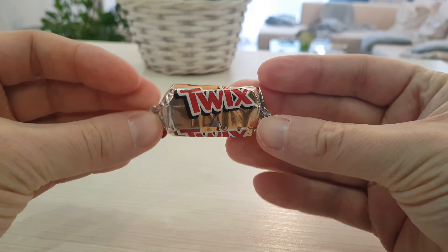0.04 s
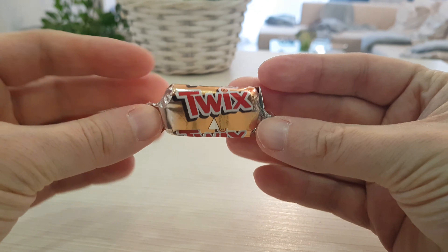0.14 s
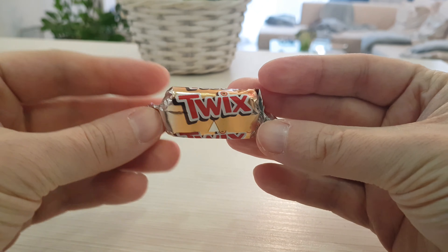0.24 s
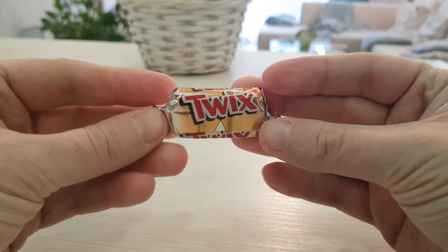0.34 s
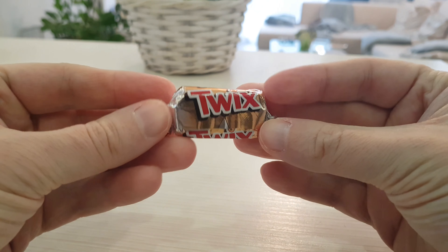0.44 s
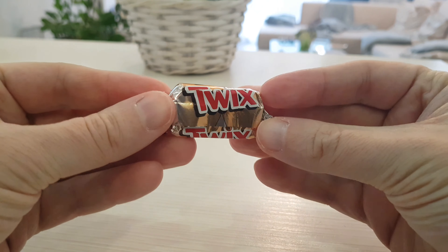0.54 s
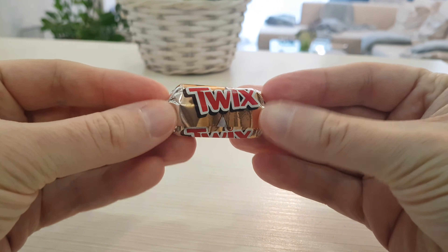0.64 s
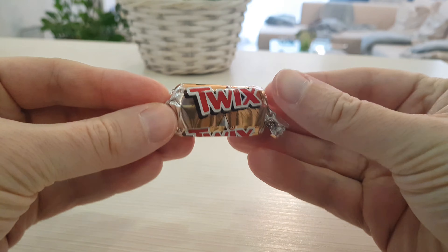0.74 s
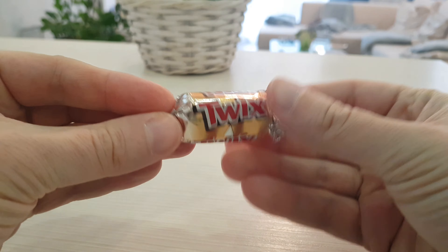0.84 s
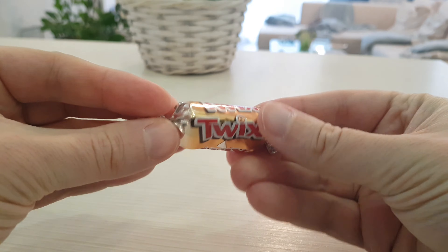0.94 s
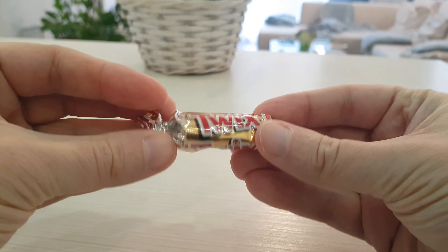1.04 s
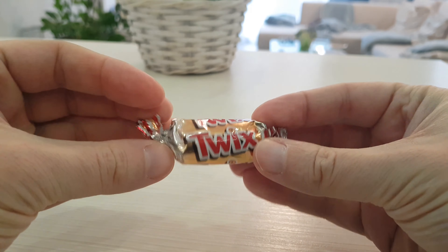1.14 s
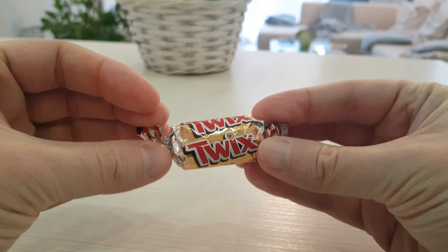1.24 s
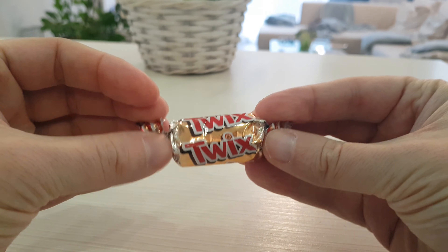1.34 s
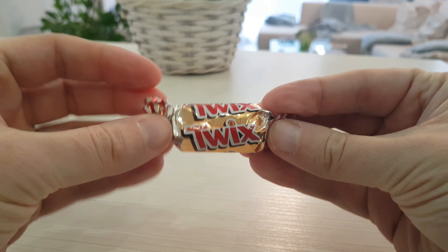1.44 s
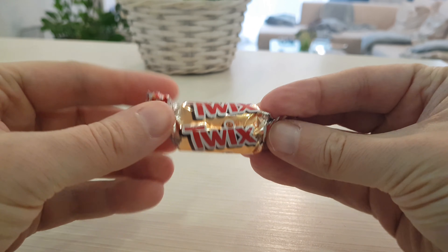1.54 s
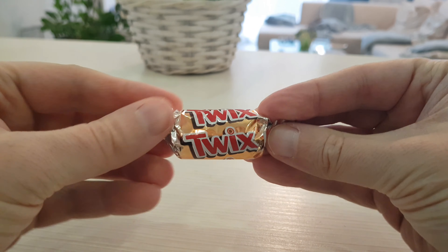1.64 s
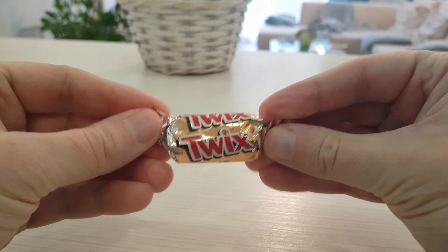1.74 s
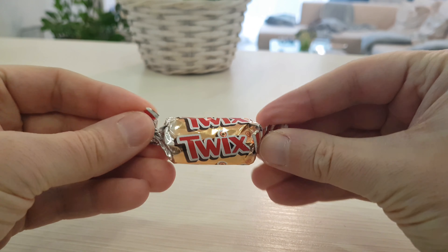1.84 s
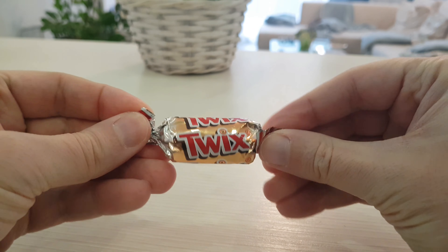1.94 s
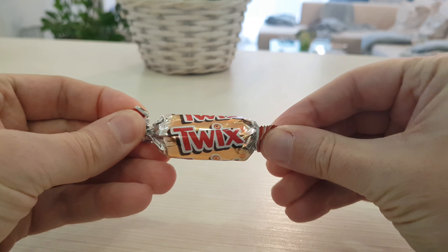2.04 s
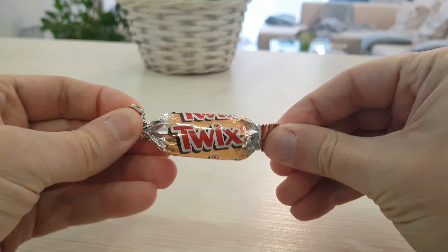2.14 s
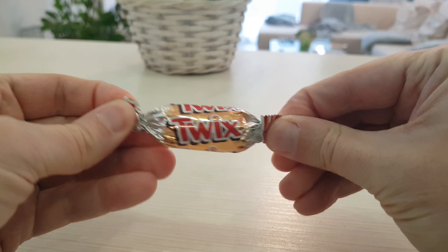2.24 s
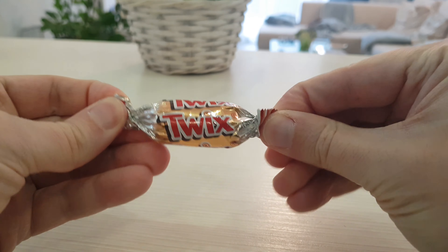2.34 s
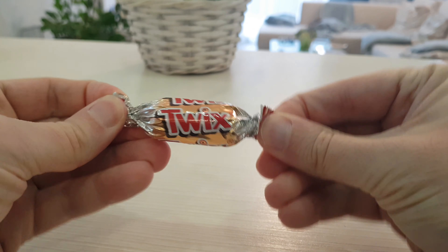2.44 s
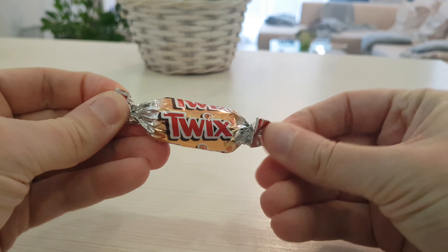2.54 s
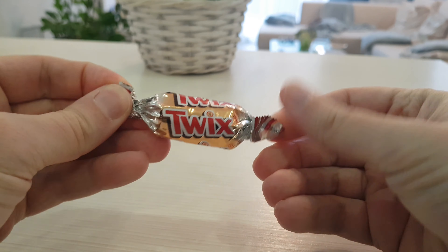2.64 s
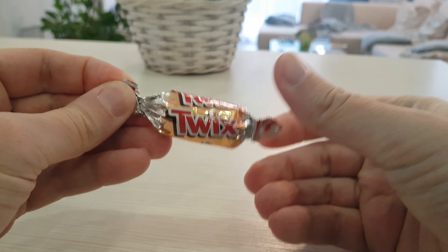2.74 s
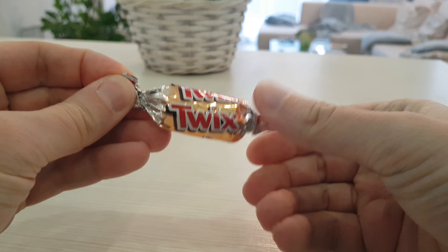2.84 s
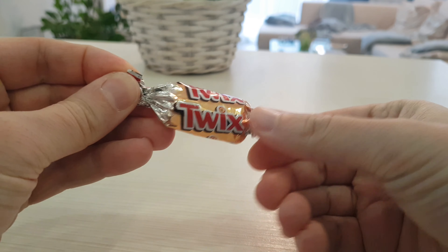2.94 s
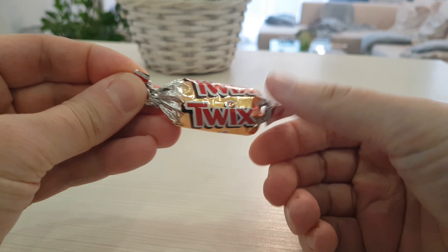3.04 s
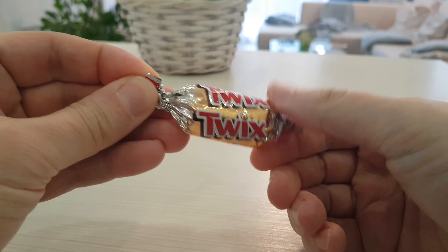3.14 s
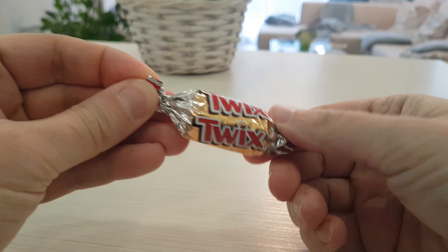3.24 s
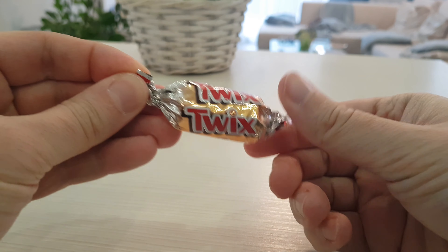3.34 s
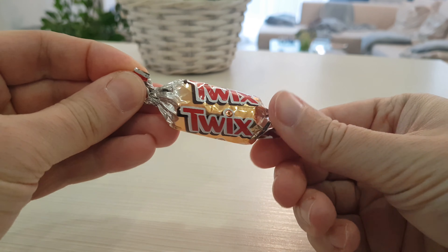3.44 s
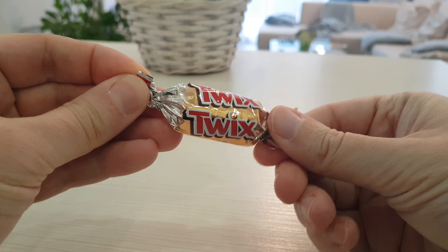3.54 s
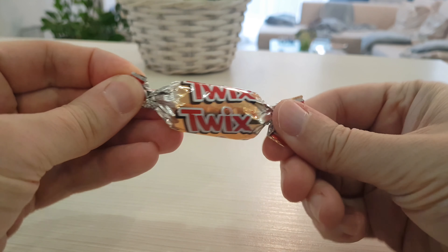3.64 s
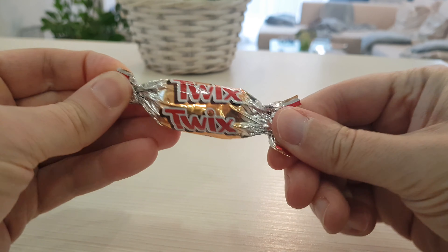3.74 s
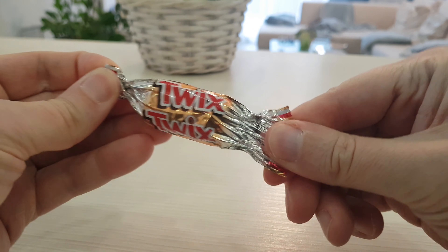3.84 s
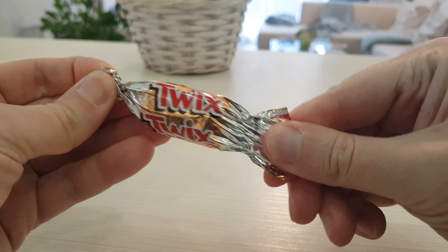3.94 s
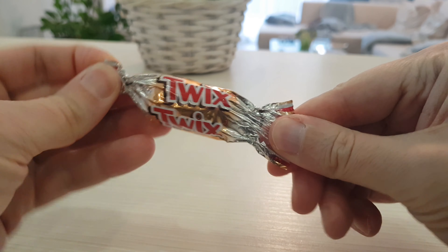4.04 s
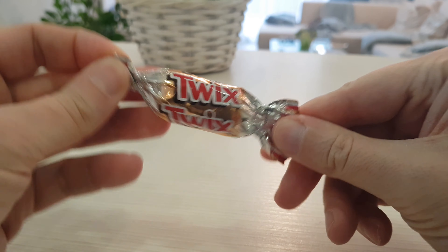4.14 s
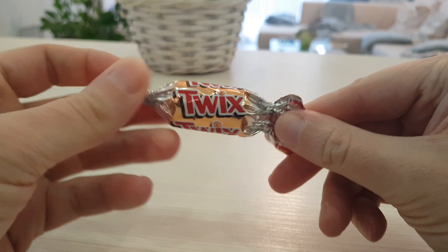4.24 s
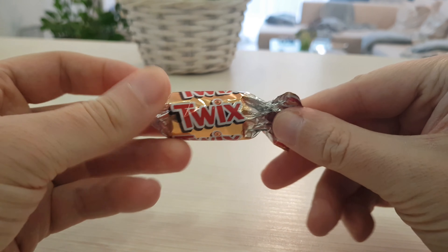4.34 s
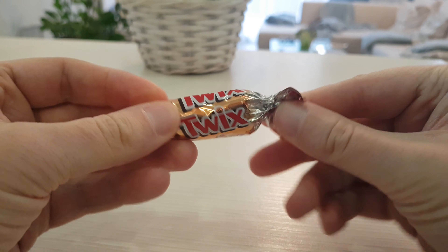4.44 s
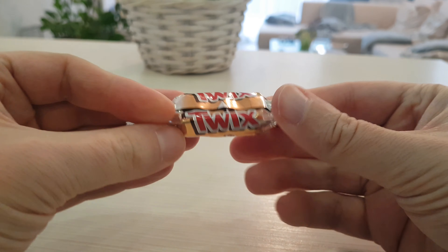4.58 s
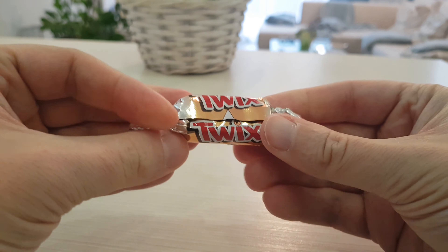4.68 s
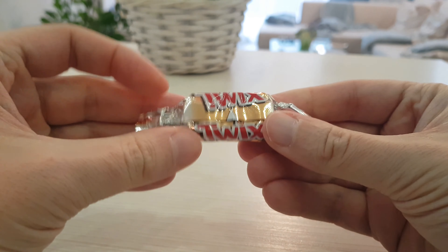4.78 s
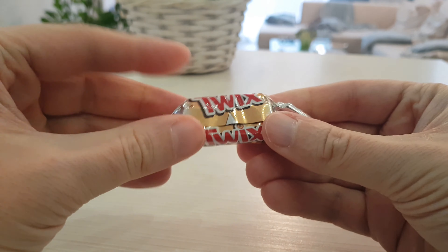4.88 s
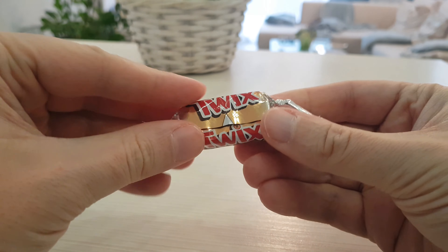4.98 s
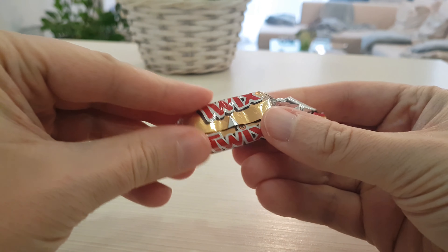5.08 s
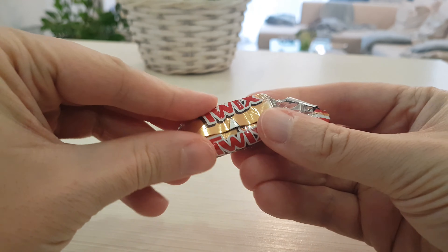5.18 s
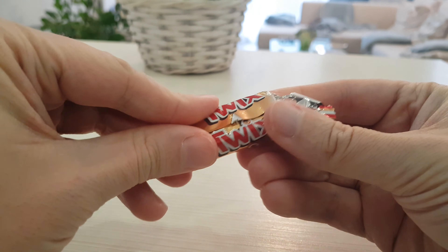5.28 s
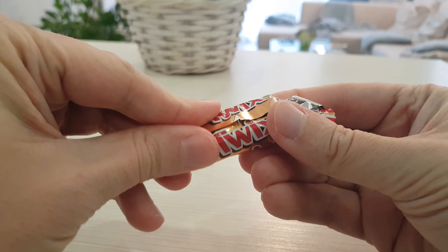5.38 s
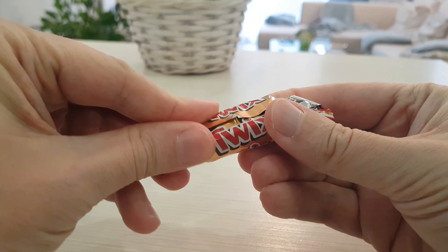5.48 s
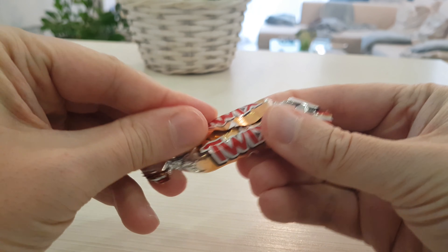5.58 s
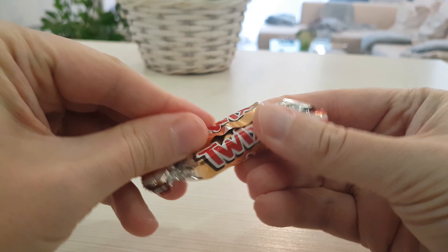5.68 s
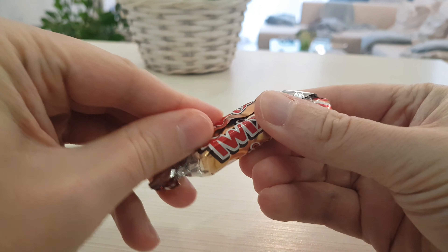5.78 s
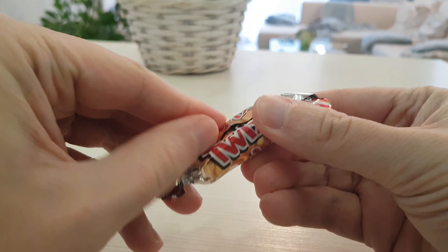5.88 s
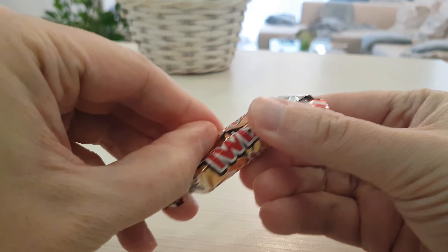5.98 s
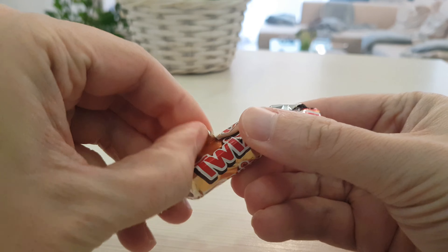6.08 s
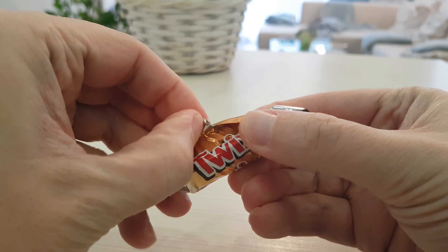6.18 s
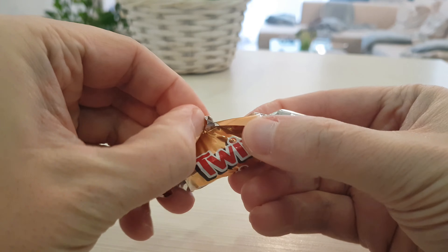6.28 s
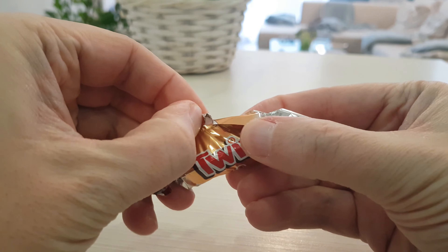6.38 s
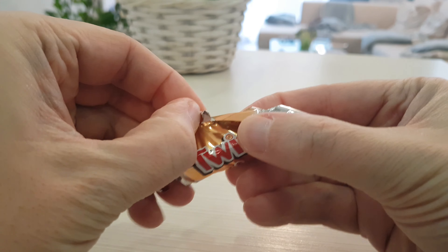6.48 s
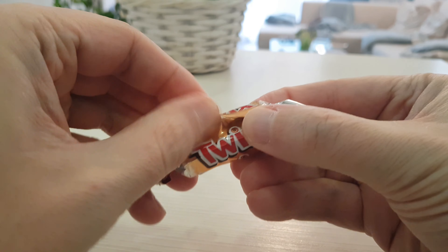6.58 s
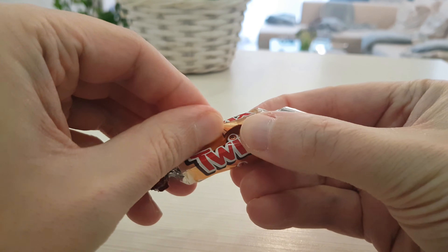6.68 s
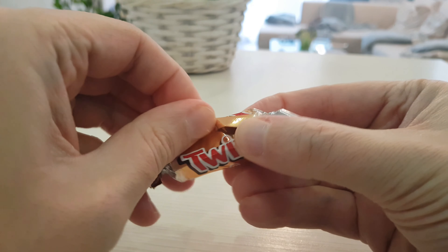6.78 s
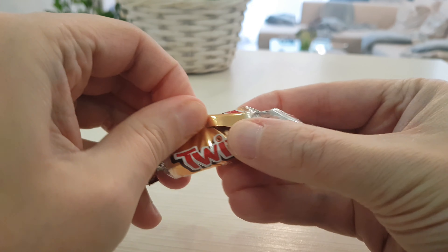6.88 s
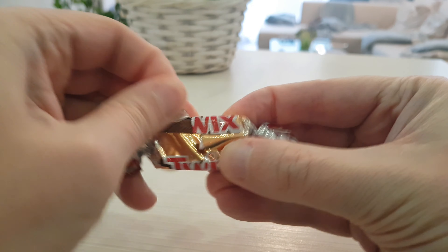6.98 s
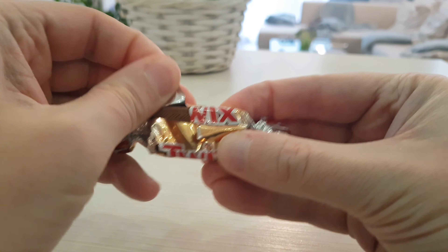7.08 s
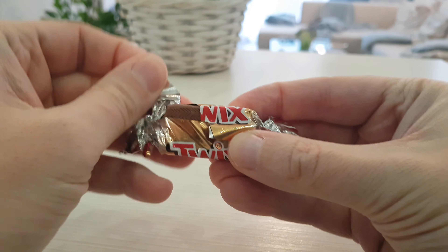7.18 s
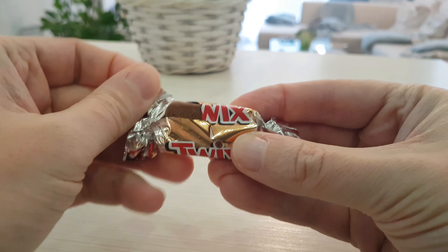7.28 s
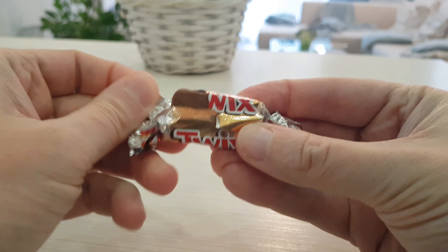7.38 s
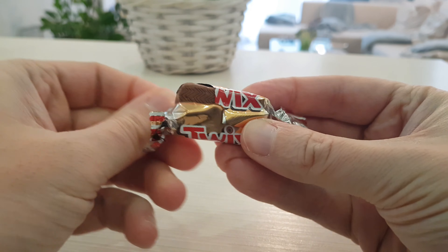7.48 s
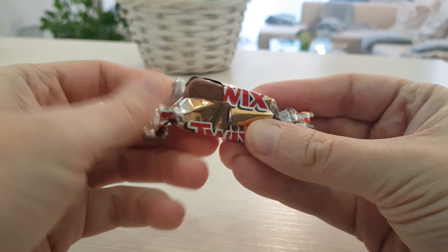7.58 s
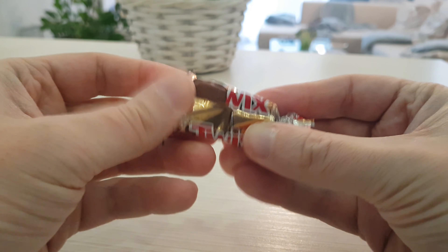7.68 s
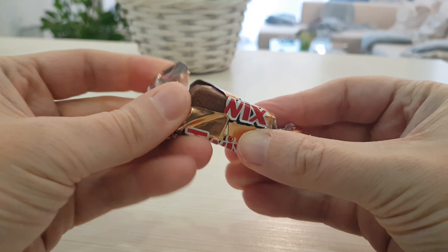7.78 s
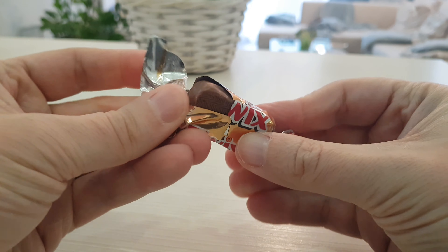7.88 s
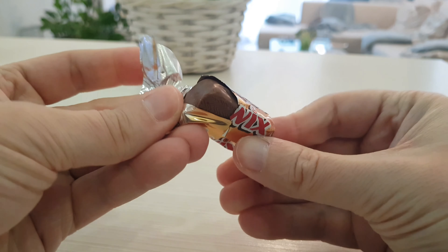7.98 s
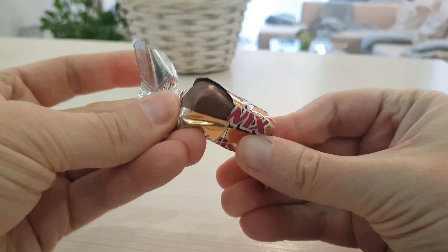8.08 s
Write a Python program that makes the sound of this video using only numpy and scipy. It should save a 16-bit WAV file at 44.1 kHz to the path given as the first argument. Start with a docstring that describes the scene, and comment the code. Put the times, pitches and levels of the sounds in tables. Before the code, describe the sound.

A foil candy wrapper crinkles and snaps in bright, uneven bursts as fingers twist it open close by, over a faint low hum.

```python
"""Fingers twist and peel a foil candy wrapper open, close by on a table in a quiet room.
From the start an appliance hums in steady tones over filtered noise for air, and the held foil stirs faintly.
Soon creases snap for about a millisecond each (clicks through resonances), with swarms of tiny clicks between.
From about 0.9 s the hollow wrapper knocks now and then, and near 3 s a fingertip rubs it (jerky noise).
Snaps crowd around 2.2, 3.9, 6.2 and 7.3 s; the strongest two knocks, the seam popping, come after 7 s."""
import sys
import numpy as np
from scipy import signal
from scipy.fft import rfft, irfft, next_fast_len
from scipy.io import wavfile
from scipy.ndimage import uniform_filter1d, map_coordinates

SR = 44100
rng = np.random.default_rng(int(sys.argv[2]) if len(sys.argv) > 2 else 0)


def dump(signal):
    """Clip the signal to [-1, 1] and save it as 16-bit WAV at the path in sys.argv[1]."""
    limited = np.clip(np.atleast_2d(signal).T, -1, 1)
    pcm = np.round(limited * 32767).astype(np.int16)
    wavfile.write(sys.argv[1], SR, pcm)


N = 358091

# creases that buckle loudly: t/s, crack level/dB, pitch f/Hz, sizzle level/dB (levels before a common trim)
CREASES = [(0.054, -42.5, 5200, -45), (0.1576, -32.5, 5960, -42), (0.2244, -42, 4660, -39),
           (1.2219, -37.5, 5044, -44.5), (1.2273, -33.5, 5430, -37), (1.396, -39, 5330, -44),
           (1.4282, -30.5, 4660, -32.5), (1.483, -44, 4388, -39), (1.5628, -35.5, 4680, -30),
           (1.648, -39, 5440, -39), (1.6601, -41.5, 5240, -45), (1.82, -31.5, 6440, -47),
           (1.8621, -33.5, 6170, -40.5), (1.904, -41.5, 6800, -53), (1.9823, -40, 5549, -48),
           (2.0054, -45, 2391, -54), (2.0928, -34.5, 3560, -32), (2.11, -29.5, 5900, -37),
           (2.1403, -24, 4350, -29), (2.1535, -34, 4610, -31), (2.215, -35, 4673, -36),
           (2.222, -26.5, 4000, -37), (2.2302, -23, 4230, -46), (2.243, -32, 4100, -36),
           (2.2726, -37, 5795, -37), (2.2886, -30, 6520, -33), (2.2998, -23.5, 4630, -31),
           (2.308, -27.5, 3500, -53), (2.33, -23, 4650, -31.5), (2.369, -25, 3740, -37),
           (2.5118, -33, 5200, -43), (2.6256, -31, 5684, -35), (2.696, -39, 4585, -43),
           (2.9018, -43.5, 5420, -43), (2.9974, -37, 4130, -40), (3.0207, -28, 3100, -37.5),
           (3.2767, -40, 3130, -51), (3.2873, -35.5, 4488, -37), (3.4111, -38, 3500, -38),
           (3.4651, -37.5, 4390, -45), (3.49, -40.5, 2730, -42.5), (3.5912, -31, 4600, -42),
           (3.6271, -26.5, 3900, -39.5), (3.756, -31, 3225, -32.5), (3.806, -26, 3695, -33),
           (3.815, -25, 5030, -28), (3.8228, -24, 4370, -35), (3.8432, -24.5, 4000, -40),
           (3.847, -19.5, 3900, -32), (3.862, -34, 4770, -21.5), (3.8685, -19.5, 3300, -36),
           (3.9173, -39, 5500, -29), (3.9227, -25.5, 4237, -26), (3.943, -20, 4400, -30),
           (3.95, -24, 3905, -23.5), (3.9623, -26, 3218, -36), (3.9981, -30.5, 5810, -33.5),
           (4.051, -23.5, 4300, -32), (4.067, -35, 4850, -36), (4.1671, -34.5, 3900, -46),
           (4.1776, -34.5, 3710, -65), (4.2071, -33.5, 4184, -47), (4.2497, -32, 4600, -50),
           (4.3477, -34.5, 5015, -36), (4.427, -37.5, 5000, -36), (4.5136, -34.5, 5356, -48),
           (4.543, -24.5, 3695, -33), (4.5919, -34, 3382, -32), (4.6045, -36, 5110, -46),
           (4.6278, -43, 5010, -36), (4.6322, -35, 5190, -42), (4.759, -32.5, 4340, -41),
           (4.8621, -38.5, 4610, -63), (5.0962, -38.5, 4300, -69), (5.2081, -36, 3803, -50),
           (5.2537, -36.5, 4443, -55), (5.3149, -36, 4300, -38.5), (5.4112, -31.5, 5256, -30),
           (5.511, -31.5, 4740, -38), (5.6321, -39, 5363, -43), (5.7632, -40, 5472, -44),
           (5.8078, -32, 5590, -39), (5.9523, -42, 4446, -46), (6.0153, -34.5, 5630, -39),
           (6.0242, -38, 5350, -36), (6.0458, -34, 4100, -37.5), (6.0907, -35, 5055, -32),
           (6.1231, -33.5, 5614, -38), (6.185, -26.5, 5470, -41), (6.19, -26.5, 4800, -19.5),
           (6.1983, -29, 4300, -41), (6.2304, -32, 4210, -44), (6.235, -23.5, 4140, -31.5),
           (6.2744, -33, 4586, -38.0), (6.2937, -31.5, 3990, -33.5), (6.3, -33, 4050, -39),
           (6.3101, -41, 2650, -56), (6.3308, -33.5, 4763, -42.5), (6.379, -36.5, 4910, -38),
           (6.4006, -41.5, 3030, -46), (6.416, -41.5, 3580, -47), (6.44, -32.5, 3860, -39),
           (6.461, -41, 5095, -40), (6.7225, -31, 5690, -38), (6.739, -33.5, 3415, -36),
           (6.7573, -29, 5310, -36), (6.764, -26.5, 5505, -34), (6.7915, -34.5, 4126, -47),
           (6.8686, -40, 3634, -39.5), (6.919, -26.5, 4883, -39), (7.0052, -33.5, 3543, -46),
           (7.189, -33, 5803, -49), (7.1992, -29, 4287, -49), (7.2383, -25.5, 6005, -34),
           (7.249, -27.5, 4580, -27), (7.2556, -36, 5494, -35), (7.2666, -28, 4470, -31),
           (7.2733, -22, 4404, -24.5), (7.3092, -43, 5598, -38), (7.323, -30, 5564, -27),
           (7.384, -29, 4314, -22), (7.4055, -25, 4250, -23), (7.4518, -35.5, 4580, -41),
           (7.518, -32, 5910, -35.5), (7.6139, -35, 3290, -41), (7.677, -26.5, 3594, -26),
           (7.8327, -29, 4854, -35), (7.8635, -28, 5060, -28), (7.955, -32, 4312, -32.5),
           (7.975, -29.5, 4726, -38), (8.0434, -36, 6517, -40), (8.0837, -32.5, 4780, -36.5)]
# colour of the small facets: f/Hz, relative level per Hz/dB
FACET_COLOUR = [(400, -42), (1900, -20.5), (2900, -12), (4200, -0.5), (6200, 1.5), (8300, -15),
                (11500, -1.5), (15000, -6), (16500, -18)]
STRAIN_S = .002  # a facet creaks for this long before it flips


def amp(db):
    """Turn decibels into a plain gain."""
    return 10 ** (np.asarray(db) / 20)


def unit(x):
    """Scale a sound to an average strength (rms) of 1."""
    return x / np.sqrt(np.mean(x ** 2) + 1e-20)


def along(points, hz):
    """Read a value between (Hz, value) points, with pitch on a log axis."""
    f, v = np.transpose(points)
    return np.interp(np.log(hz + 1), np.log(f), v)


def curve(rows):
    """Join (time, value) points by straight lines, one value per sample."""
    s, values = np.transpose(rows)
    return np.interp(np.arange(N) / SR, s, values)


def wobble(rate):
    """A smooth random curve through a given number of random points a second."""
    points = rng.standard_normal(int(N * rate / SR) + 4)
    coarse = np.arange(0, N, 32)
    smooth = map_coordinates(points, [coarse * rate / SR])
    return np.interp(np.arange(N), coarse, smooth)


def filtered(x, response):
    """Change the strength and timing of each frequency by a complex response."""
    n = x.shape[-1]
    padded = 2 * next_fast_len((n + min(n, 8192)) // 2)
    spectrum = rfft(x, padded) * response(np.fft.rfftfreq(padded, 1 / SR))
    return irfft(spectrum, padded)[..., :n]


def coloured(x, spectrum, size=8192):
    """Colour a sound without smearing it backwards in time, so clicks keep their sharp front."""
    cepstrum = irfft(np.log(amp(along(spectrum, np.fft.rfftfreq(size, 1 / SR)))))
    # folding the cepstrum forwards makes a minimum-phase filter
    cepstrum[1:] *= 2 * (np.arange(1, size) < size // 2)
    kernel = irfft(np.exp(rfft(cepstrum)))[:x.shape[-1]]
    return signal.oaconvolve(x, np.array(kernel, ndmin=x.ndim), axes=-1)[..., :x.shape[-1]]


def resonate(x, modes):
    """Pass a sound through a few resonances: (centre Hz, width Hz, dB), with alternating signs."""
    def response(f):
        total = 0
        for k, (centre, width, db) in enumerate(modes):
            damping = 1j * f * width
            total = total + (-1) ** k * amp(db) * damping / (centre * centre - f * f + damping)
        return total
    return filtered(x, response)


def stereo_noise(side_db, size=N):
    """White noise with a given share of left-right difference."""
    mid, side = rng.standard_normal((2, size))
    return np.array([mid + amp(side_db) * side, mid - amp(side_db) * side])


def add(track, s, sound):
    """Mix a sound into the track at time s."""
    part = track[:, max(round(s * SR), 0):][:, :sound.shape[1]]
    part += sound[:, :part.shape[1]]


def background(hum_db, air_db, hiss_db, rumble_hz):
    """Slightly unsteady appliance tones over low room noise, a shifting rumble and faint hiss."""
    # the appliance's tones before a common trim: f/Hz, level/dB
    hum_tones = [(60.5, -67.5), (99, -74.5), (186, -68), (388.5, -75), (459.6, -72), (495, -71.5)]
    # one more tone swells and fades, before the same trim: t/s, level/dB
    swell = [(0.5, -76), (1.55, -61), (2.4, -75), (3.05, -65.5), (4.0, -68), (4.6, -80), (5.15, -63.5),
             (6.05, -66.5), (6.45, -75.5)]
    swell_hz = 247.8
    # colour of the room's murmuring air: f/Hz, relative level per Hz/dB
    air_colour = [(26, -26), (42, -2.5), (170, -2.5), (330, -1), (520, -9.5), (660, -19), (1400, -29),
                  (6000, -35)]
    # a low rumble swells as the hands move, before its random unsteadiness: t/s, level/dB
    rumble_levels = [(0, -62), (.2, -53), (.55, -61), (.95, -58.5), (1.8, -60), (2.1, -65), (3.1, -71),
                     (4.9, -60), (6.6, -65.5), (7.1, -56.5), (7.9, -54)]
    t = np.arange(N) / SR
    hum = np.zeros(N)
    for hz, db in list(hum_tones) + [(swell_hz, curve(swell))]:
        level = amp(db + 1.46 * wobble(0.9))
        phase = 2 * np.pi * hz * t + 0.5 * wobble(1)
        hum += level * np.sqrt(2) * np.sin(phase)
    air = unit(coloured(stereo_noise(-6.5), air_colour))
    low_band = signal.butter(3, [40, rumble_hz], "bandpass", fs=SR, output="sos")
    low = signal.sosfilt(low_band, stereo_noise(-18.0))
    rumble = amp(curve(rumble_levels) + 1.5 * wobble(7)) * unit(low)
    hiss = unit(coloured(stereo_noise(-0.53), FACET_COLOUR))
    return amp(hum_db) * hum + amp(air_db) * air + rumble + amp(hiss_db) * hiss


def work():
    """Levels in dB of small facets and broad panels: each twist grips, holds and settles."""
    # twists and tugs: start t/s, length t/s, crinkle level/dB, panel rustle relative to it level/dB
    # (levels before a common trim)
    twists = [(0.188, 0.038, -51, -26), (0.293, 0.046, -57, -20.5), (0.622, 0.15, -51, -16),
              (0.821, 0.095, -50, -12), (0.972, 0.2, -59, -12), (1.243, 0.0706, -47, -20),
              (1.434, 0.015, -39, -20), (1.492, 0.029, -44, -18), (1.584, 0.0946, -52, -19),
              (1.717, 0.2, -53.5, -24), (1.969, 0.037, -46, -20), (2.078, 0.11, -46, -14),
              (2.224, 0.022, -36, -20), (2.296, 0.079, -41, -17.5), (2.624, 0.12, -48, -10),
              (2.982, 0.11, -51, -12), (3.27, 0.06, -43, -12), (3.392, 0.03, -43, -11),
              (3.592, 0.056, -52, -9), (3.722, 0.061, -49, -9), (3.796, 0.075, -34, -18),
              (3.921, 0.034, -30.5, -20), (4.048, 0.079, -49, -18), (4.19, 0.19, -49, -12),
              (4.25, 0.058, -38, -14), (4.493, 0.15, -45.5, -13), (4.662, 0.038, -43, -10),
              (4.828, 0.039, -47, -16), (5.037, 0.085, -54, -14.5), (5.188, 0.14, -48, -13),
              (5.401, 0.01, -43, -16), (5.667, 0.016, -38, -19.5), (5.784, 0.024, -43, -17),
              (5.857, 0.01, -46, -14), (5.998, 0.15, -48, -21), (6.188, 0.025, -41.5, -20),
              (6.272, 0.074, -50, -13), (6.636, 0.295, -47.5, -10), (6.682, 0.0346, -41, -17.5),
              (7.021, 0.15, -48, -10), (7.045, 0.028, -33, -12), (7.21, 0.06, -40, -15.5),
              (7.332, 0.13, -43, -15), (7.511, 0.47, -53, -8), (7.611, 0.085, -42.5, -10.5),
              (8.031, 0.054, -40, -18.5)]
    grip_db_per_s, settle_db_per_s = 699.5, 560
    held_db, held_panels_db = -68.5, -14  # faint stirring of held foil; its panels relative to that
    t = np.arange(N) / SR
    # powers of overlapping twists add up
    small = np.full(N, amp(held_db) ** 2)
    broad = np.full(N, amp(held_db + held_panels_db) ** 2)
    for start, length, db, panels_db in twists:
        near = slice(*np.searchsorted(t, [start - .1, start + length + .3]))
        early = np.maximum(start - t[near], 0)
        late = np.maximum(t[near] - start - length, 0)
        power = amp(db - grip_db_per_s * early - settle_db_per_s * late) ** 2
        small[near] += power
        broad[near] += power * amp(panels_db) ** 2
    return 10 * np.log10(small), 10 * np.log10(broad)


def buckles(count, flip_t60, ring_t60, ring_db, side_db, pan_db, rise_t60, size=512, order=9):
    """Stereo clicks: a facet strains, flips in two steps, and the foil around it rings briefly."""
    # the lesser step falls within step_s of the main flip, before or after, typically step_db weaker
    step_s, step_db = .0018, -9
    tint_db = 3  # strength of each click's own spectral peaks and hollows
    each = (count, 1, 1)
    t = np.arange(size) / SR - STRAIN_S
    after, before = np.maximum(t, 0), np.minimum(t, 0)

    mode_hz = rng.uniform(700, 16000, (count, 1, order, 1))
    phase = rng.uniform(0, 2 * np.pi, (count, 1, order, 1)) + rng.normal(0, 0.58, (count, 2, order, 1))
    ring = np.sin(2 * np.pi * mode_hz * t + phase).sum(2) / np.sqrt(order)
    flip = np.array([stereo_noise(side_db, size=size) for _ in range(count)])
    scatter = np.array([stereo_noise(0, size=size) for _ in range(count)])

    def give(age):
        return (age >= 0) * amp(-60 * np.maximum(age, 0) / flip_t60)

    step_delay = rng.uniform(-step_s, step_s, each)
    step_gain = amp(step_db) * rng.rayleigh(np.sqrt(.5), each)
    click = flip * (give(t) + step_gain * give(t - step_delay))
    ring_level = amp(60 * before / rise_t60 - 60 * after / ring_t60)
    click += amp(ring_db) * (ring + .5 * scatter) * ring_level

    # each facet faces its own way and reaches the right side slightly later
    pan = amp(rng.normal(0, pan_db, each) * np.array([[1], [-1]]))
    lag = rng.uniform(0, 1.1e-4, each) * np.array([[0], [1]])
    # its shape gives it a colour of its own: random ripples across the spectrum
    ripples = np.arange(2, 13)
    weights = rng.normal(0, np.sqrt(2 / len(ripples)), (count, 1, len(ripples)))

    def tint_and_lag(hz):
        waves = np.cos(np.pi * ripples[:, None] * np.sqrt(2 * hz / SR))
        return amp(tint_db * weights @ waves) * np.exp(-2j * np.pi * hz * lag)

    click = filtered(click * pan, tint_and_lag)
    return click / np.sqrt(np.sum(click ** 2, axis=(1, 2), keepdims=True))


def swarm(level_db, spectrum, rate, rate_per_db, spread_db, clump_db, side_db, slide_db, count=120):
    """Tiny buckles in clumps, denser as the foil is worked harder, over the hiss of foil on foil."""
    density_db = rate_per_db * (level_db - np.median(level_db)) + clump_db * wobble(70)
    density = rate * amp(density_db)  # buckles per second
    starts = np.flatnonzero(rng.random(N) < density / SR)
    sizes = amp(spread_db * np.minimum(rng.standard_normal(len(starts)), 2))
    clicks = buckles(count, flip_t60=0.0018, ring_t60=0.015, ring_db=-13,
                     side_db=side_db, pan_db=2.5, rise_t60=0.0052)
    track = np.zeros((2, N))
    for start, size in zip(starts, sizes):
        add(track, start / SR - STRAIN_S, size * clicks[rng.integers(count)])
    track = coloured(track, spectrum)
    # the work of the fingers is shared out among the creases of each moment
    power = np.mean(track ** 2, axis=0)
    for _ in range(2):
        power = uniform_filter1d(power, size=1500)
    power = np.abs(power)
    track /= np.sqrt(power + 0.026 * np.median(power))
    slide = unit(coloured(stereo_noise(-0.36), spectrum))
    return amp(level_db) * (track + amp(slide_db) * slide)


def ticks(level_db, rate, over_db, spread_db):
    """Now and then a middling crease gives way and stands out from the crinkle."""
    count = int(rate * N / SR)
    times = rng.uniform(0, N / SR - .02, count)
    sizes_db = level_db[(times * SR).astype(int)] + over_db + spread_db * rng.uniform(-0.15, 1, count)
    clicks = buckles(count, flip_t60=0.0019, ring_t60=0.017, ring_db=-12.5,
                     side_db=-18.0, pan_db=2.0, rise_t60=0.0057)
    clicks = coloured(clicks, FACET_COLOUR)
    track = np.zeros((2, N))
    for s, db, click in zip(times, sizes_db, clicks):
        add(track, s, amp(db) * click / np.abs(click).max())
    return track


def crinkle(facets_db, panels_db, folds_db):
    """Small facets crinkle brightly, folds crackle in the middle and broad panels rustle lower down."""
    # colour of the folds: f/Hz, relative level per Hz/dB
    fold_colour = [(900, -26.5), (2700, -3), (6000, -18.5)]
    # colour of the broad panels: f/Hz, relative level per Hz/dB
    panel_colour = [(250, -2), (720, 1), (1000, -5.5), (1400, 4.5), (2400, -3), (6000, -21.5)]
    fold_growth = 0.25  # extra dB the folds fall behind per dB that the twisting eases
    hold_db, hold_s = -5, .01  # dip just before a loud snap, and its time constant
    small_db, broad_db = work()
    small = swarm(small_db + facets_db, FACET_COLOUR, rate=360, rate_per_db=0.27, spread_db=8.0,
                  clump_db=6, side_db=-0.5, slide_db=-11)
    broad = swarm(broad_db + panels_db, panel_colour, rate=280, rate_per_db=0.1, spread_db=7.5,
                  clump_db=5, side_db=-17.0, slide_db=-8.5)
    # folds buckle when the panels bend, and all the more under hard twisting
    fold_db = (small_db + broad_db) / 2 + folds_db + fold_growth * (small_db - small_db.max())
    folds = swarm(fold_db, fold_colour, rate=170, rate_per_db=0.5, spread_db=7.5,
                  clump_db=6, side_db=-1, slide_db=-15)
    stray = ticks(small_db, rate=22, over_db=15, spread_db=2.5)
    # the foil holds still while strain builds up for the next loud snap
    t = np.arange(N) / SR
    times = np.append(np.sort(np.array(CREASES)[:, 0]), np.inf)
    wait = times[np.searchsorted(times, t)] - t
    return (small + folds + broad + stray) * amp(hold_db * np.exp(-wait / hold_s))


def room(x, early_db, tail_db, size=22050):
    """Nearby furniture answers after 8 ms, and the walls ring on, the treble dying sooner."""
    # how long the room rings: f/Hz, time to fall by 60 dB t/s
    ring_times = [(4000, 0.35), (15000, 0.14)]
    hz, t, z = signal.stft(rng.standard_normal((2, size)), SR, nperseg=256)
    fading = z * amp(-60 * t / along(ring_times, hz)[:, None])
    tail = signal.istft(fading, SR, nperseg=256)[1]
    t = np.arange(tail.shape[1]) / SR
    tail *= np.minimum(t / 0.0049, 1)
    early = rng.standard_normal(tail.shape) * (t > .008) * amp(-60 * np.abs(t - .008) / 0.035)
    answer = amp(tail_db) * tail / np.linalg.norm(tail[0])
    answer += amp(early_db) * early / np.linalg.norm(early[0])
    return signal.fftconvolve(x, answer, axes=1)[:, :N]


def snaps(crack_db, sizzle_db, rightward_db, crease_q):
    """The loud creases; the size of each facet sets its pitch and its share of body."""
    # the shell that lends each snap its body: f/Hz, width f/Hz, level/dB
    shell = [(670, 140, -9.5), (1840, 1560, 4)]
    # bands of a snap's body, crack and sizzle: low f/Hz, high f/Hz
    band_edges = [(600, 2600), (2500, 8000), (8000, 17000)]
    # a larger facet cracks lower and has more body; body_db is relative to the untrimmed crack
    usual_hz, body_db, body_db_per_octave = 3720, -13, 23
    times, cracks, pitches, sizzles = np.transpose(CREASES)
    bodies = cracks + body_db + body_db_per_octave * np.log2(usual_hz / pitches)
    clicks = buckles(len(times), flip_t60=0.0021, ring_t60=0.018, ring_db=-18,
                     side_db=-4.5, pan_db=1.5, rise_t60=0.007)
    pitch = pitches[:, None, None]
    q = crease_q * np.maximum(pitch / usual_hz, 1)  # small facets ring more purely

    def crease(f):
        return (1j * f * pitch / (q * (pitch ** 2 - f * f) + 1j * f * pitch)) ** 2

    body = resonate(clicks, shell)
    crack = filtered(clicks, crease)
    sizzle = coloured(clicks, FACET_COLOUR) * amp([[-rightward_db], [rightward_db]])
    levels = bodies, cracks + crack_db, sizzles + sizzle_db
    span = .0025 * SR  # levels are reckoned as if each click's energy filled 2.5 ms
    shaped = np.zeros_like(clicks)
    for part, edges, db in zip((body, crack, sizzle), band_edges, levels):
        band = signal.sosfilt(signal.butter(2, edges, "bandpass", fs=SR, output="sos"), part)
        rms = np.sqrt(np.sum(band ** 2, axis=2).mean(1) / span)
        shaped += band * (amp(db) / rms)[:, None, None]
    track = np.zeros((2, N))
    for s, click in zip(times, shaped):
        add(track, s - STRAIN_S, click)
    return track


def pops(t60, size=2048):
    """The shell dents or the seam lets go, and a short push knocks the hollow wrapper."""
    # dents and seam pops: t/s, peak level/dB, pitch f/Hz
    knocks = [(0.9159, -42.5, 760), (5.24, -38.5, 711), (5.68, -40.5, 715.4), (5.8, -45.5, 715.7),
              (7.072, -24, 746), (7.6775, -30, 652), (7.788, -41, 880)]
    # the hollow wrapper around the candy: multiple of the pop's pitch, width f/Hz, relative level/dB
    pouch = [(0.43, 319.7, 4.5), (1, 163.2, 12.5), (2, 530, 5.5)]
    track, t = np.zeros((2, N)), np.arange(size) / SR
    for s, db, hz in knocks:
        push = 0.0078 * stereo_noise(-21, size=size) * amp(-60 * t / t60)
        push[:, 0] += 1
        knock = resonate(push, [(hz * ratio, width, level) for ratio, width, level in pouch])
        add(track, s, amp(db) * knock / np.abs(knock).max())
    return track


def rub(grip_db_per_s, release_db_per_s):
    """Skin sticks and slips in uneven jerks; each stroke excites the patch of foil under it."""
    # fingertip strokes: start t/s, length t/s, level/dB, resonance f/Hz, its width f/Hz
    strokes = [(2.979, 0.0043, -42.5, 1500, 740), (3.05, 0.057, -47.5, 1470, 326.2)]
    t, track = np.arange(N) / SR, np.zeros((2, N))
    slips = stereo_noise(-14) * amp(5 * np.tanh(wobble(220)))
    for start, length, db, hz, width in strokes:
        early, late = np.maximum(start - t, 0), np.maximum(t - start - length, 0)
        level = amp(db - grip_db_per_s * early - release_db_per_s * late)
        track += level * unit(resonate(slips, [(hz, width, 0)]))
    return track


def scene():
    """The wrapper, its echo and the quiet room."""
    wrapper = snaps(crack_db=-0.08, sizzle_db=1.5, rightward_db=2.1, crease_q=1.22)
    wrapper += crinkle(facets_db=-0.5, panels_db=0.5, folds_db=3)
    wrapper += rub(grip_db_per_s=5000, release_db_per_s=390)
    wrapper += pops(t60=0.015)
    echo = room(wrapper, early_db=-19.0, tail_db=-14.5)
    return wrapper + echo + background(hum_db=-1.5, air_db=-61.5, hiss_db=-71.0, rumble_hz=205)


def record(dry):
    """Cut the treble off steeply above a band limit."""
    top_hz = 16200
    return filtered(dry, lambda hz: 1 / np.sqrt(1 + (hz / top_hz) ** 160))


dry = scene()
out = record(dry)
dump(out)
```